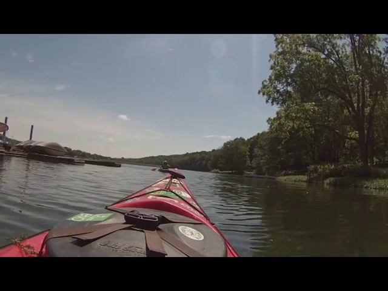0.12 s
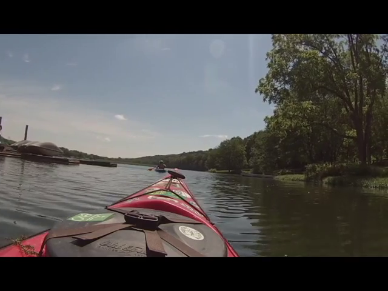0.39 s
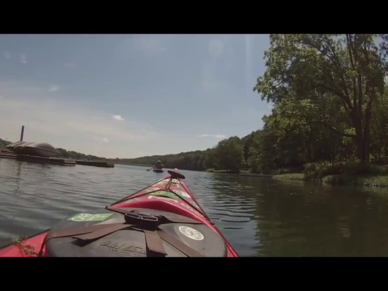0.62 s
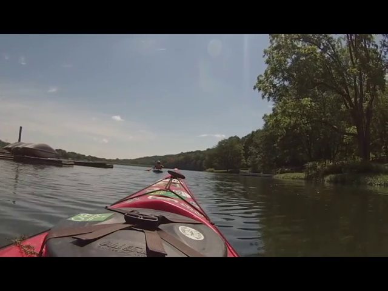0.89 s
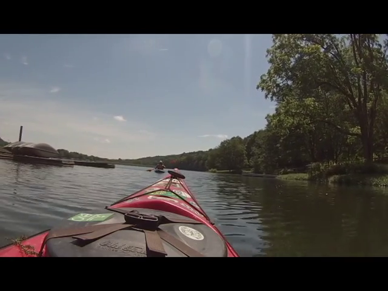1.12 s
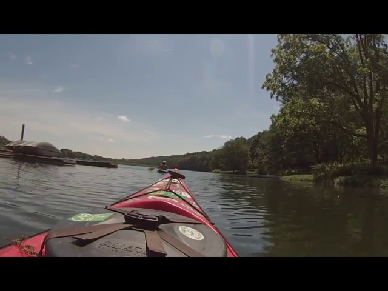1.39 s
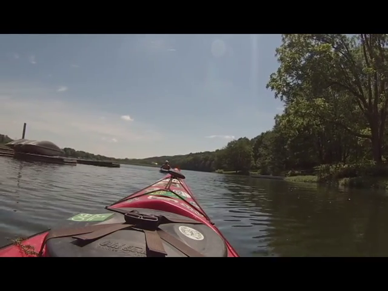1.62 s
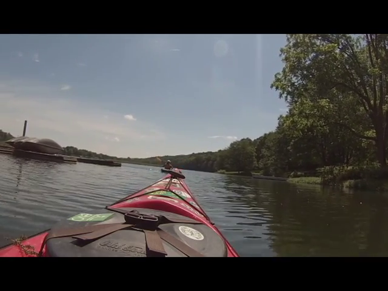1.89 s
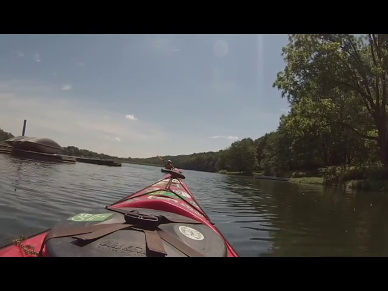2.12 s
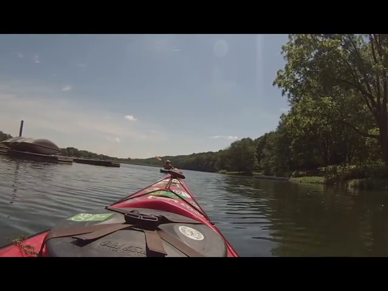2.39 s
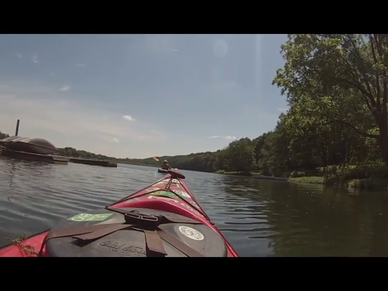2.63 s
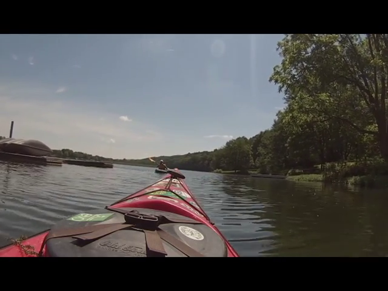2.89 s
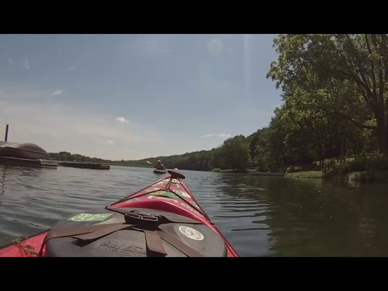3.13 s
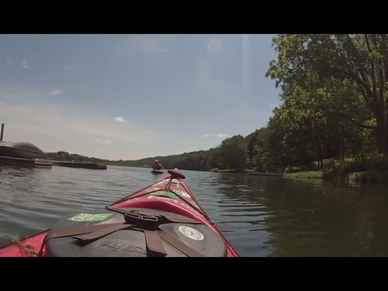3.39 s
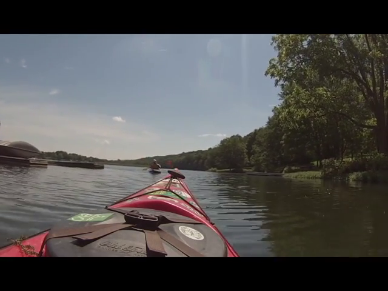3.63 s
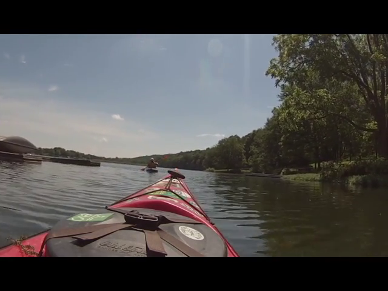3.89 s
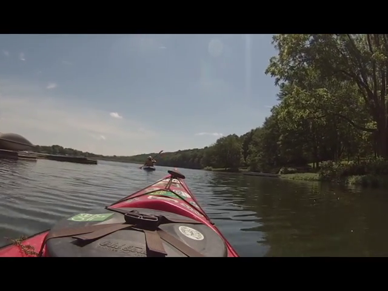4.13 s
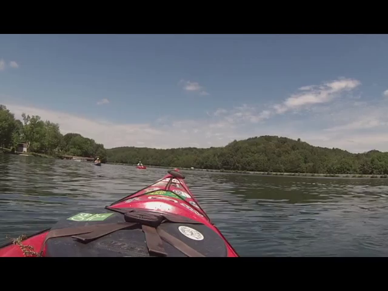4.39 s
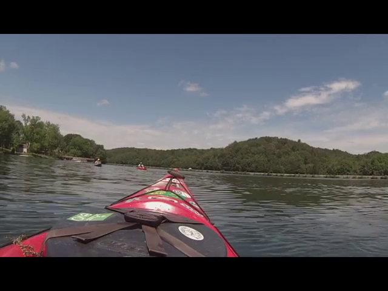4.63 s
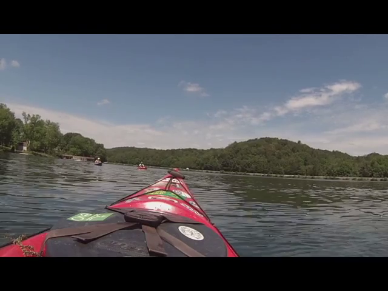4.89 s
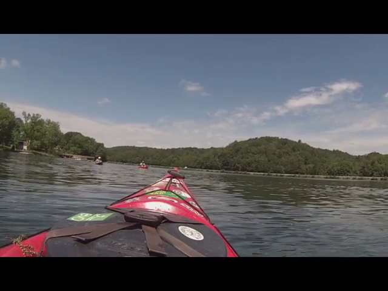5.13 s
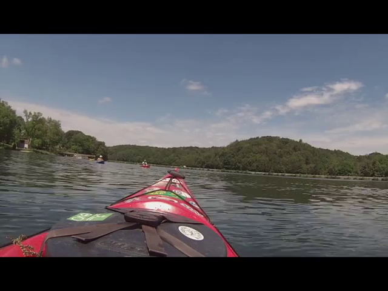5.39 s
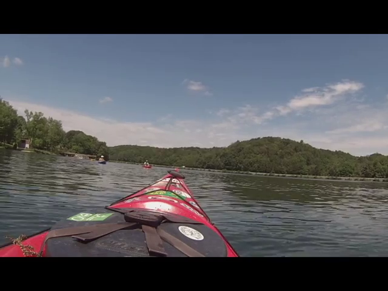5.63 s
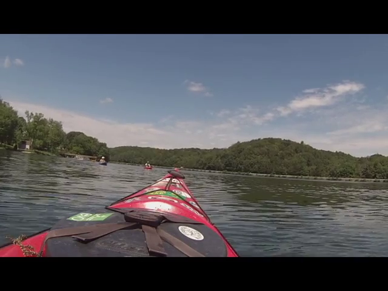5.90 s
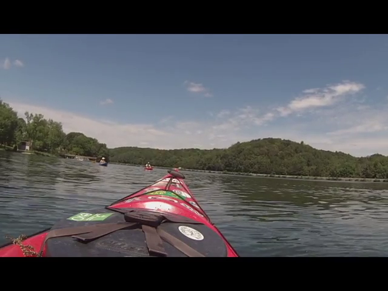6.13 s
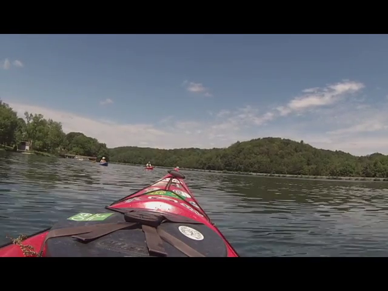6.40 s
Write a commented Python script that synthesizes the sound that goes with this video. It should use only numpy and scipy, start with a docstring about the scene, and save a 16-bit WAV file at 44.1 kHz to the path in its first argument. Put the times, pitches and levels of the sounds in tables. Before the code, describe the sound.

Steady, soft, bass-heavy hiss runs throughout, heard by a cased microphone fixed to a plastic kayak's deck, slightly muffled. In the first second there are faint buzzy bird calls, two tiny bumps at 0.2, a gentle lap and a ringing drip. At 1.3-1.5 a dry tap leads to a hollow paddle knock with small bounces, a low watery slap and bubbly drips rising in pitch. A thin distant whistle and light bumps come near 2; a little cluster of bumps with drips near 2.7. More faint bird calls pass at 3.1-3.5. Harder blows begin at 3.43, the loudest a cracking thump at 3.74, another at 3.92, with deep rocking and sliding rustle. From 4.0 the shaft drags in rapid stuttering jerks over a low murmur. At 4.39 it cuts dead, click, tiny silence, tick. Duller knocks follow at 4.48, 4.55 and 4.63, a faint thud at 4.88, then quiet hiss to 6.6.

```python
"""Far bird calls (gliding sines, throbbing noise) and light bumps over steady hiss; water laps (noise-shaken hull
modes) and drops ring (bubbles rising in pitch). A paddle knocks on a plastic kayak hull, heard from a case fixed to
the deck: struck modes, treble first through bending waves, with dry taps, cracks and low thumps (short decaying
sines). Harder blows follow, then the shaft drags in stick-slip jerks. A splice cuts the sound dead in mid-drag,
clicking on either side of a short silence; a calmer stretch with a few more blows follows."""
import sys
import numpy as np
from scipy import signal
from scipy.fft import rfft, irfft
from scipy.io import wavfile
from scipy.ndimage import uniform_filter1d

SR = 44100
rng = np.random.default_rng(int(sys.argv[2]) if len(sys.argv) > 2 else 0)


def to_wav(sig):
    """Store sig (one row per channel, or 1-D mono) as 16-bit WAV at the path in sys.argv[1].

    Samples outside -1..1 are clipped; the rate is SR.
    """
    pcm = np.clip(np.atleast_2d(sig), -1, 1) * 32767
    pcm = np.round(pcm).astype(np.int16)
    wavfile.write(sys.argv[1], SR, pcm.T)  # frames by channels


def undo_db(level):
    """Turn decibels back into plain size, where 20 dB means ten times bigger."""
    steps = np.asarray(level, float) / 20
    return 10 ** steps


N = 287529
TIME = np.arange(N) / SR
SPLICE_S, RETURN_S = 4.3869, 4.3958   # silence between
BEFORE_SPLICE = TIME < SPLICE_S


def rms_one(x):
    """Scale to rms 1."""
    return x / np.sqrt(np.mean(x ** 2) + 1e-20)


def swell(start_s, length_s, edge):
    """Smooth rise, hold and fall; edge: share of the length per ramp, above 0.5 it turns short of full level."""
    nearest_end_s = np.minimum(TIME - start_s, start_s + length_s - TIME)
    return np.sin(np.pi / 2 * np.clip(nearest_end_s / (edge * length_s), 0, 1)) ** 2


def band_passed(noise, low_hz, high_hz):
    """Noise through a band-pass filter; rms 1."""
    band = signal.butter(2, [low_hz, high_hz], "band", fs=SR, output="sos")
    return rms_one(signal.sosfilt(band, noise))


# Spectrum of the hiss. Each row: frequency in Hz, relative density in dB per Hz.
HISS_SPECTRUM = [(12, -1.5), (20, -3), (146, -2.5), (255, -6), (285, -6), (377, -7.5), (422, -9.5),
                 (642, -11.5), (1710, -17), (12000, -34.5), (15000, -42.5), (15500, -68)]


def hiss(level_db=-56, waver_db=0.27, waver_rate_hz=12):
    """Steady microphone hiss: noise strongest in the bass, its level wavering a little."""
    hz = np.fft.rfftfreq(N, 1 / SR) + 1
    colour_hz, colour_db = np.transpose(HISS_SPECTRUM)
    colour = undo_db(np.interp(np.log(hz), np.log(colour_hz), colour_db))
    waver = np.interp(TIME, np.arange(80) / waver_rate_hz, rng.standard_normal(80))
    noise = rms_one(irfft(colour * rfft(rng.standard_normal(N)), N))
    return undo_db(level_db + waver_db * waver) * noise


# Thin bird whistles. Each row: start in seconds, length in seconds, first pitch in Hz, last pitch in Hz, level in dB.
WHISTLES = [(1.98, .058, 7650, 7800, -66.5), (3.258, 0.06, 7560, 7800, -67)]


def whistles(overtone_db=-15):
    """Gliding sines with a faint octave."""
    out = np.zeros(N)
    for s, length_s, from_hz, to_hz, db in WHISTLES:
        hz = np.interp(TIME, [s, s + length_s], [from_hz, to_hz])
        phase = 2 * np.pi * np.cumsum(hz) / SR
        tone = np.sin(phase) + undo_db(overtone_db) * np.sin(2 * phase)
        out += undo_db(db) * swell(s, length_s, 0.13) * tone
    return out


# Far buzzy bird calls. Each row: start in seconds, length in seconds, centre in Hz, width in Hz, level in dB.
BUZZES = [(0.105, 0.18, 3550, 245, -69), (0.298, 0.12, 3540, 300, -72), (0.54, 0.12, 3580, 252, -67.5),
          (1.042, 0.12, 3520, 250, -74), (1.89, 0.113, 3430, 300, -72), (3.089, 0.11, 3520, 300, -70.5),
          (3.202, 0.061, 3600, 297, -71), (3.314, 0.23, 8700, 1490, -73.5)]


def buzzes(throb_hz=70, depth=0.28):
    """Narrow noise that throbs."""
    out = np.zeros(N)
    white = rng.standard_normal(N)
    throb = 1 + depth * np.sin(2 * np.pi * throb_hz * TIME)
    for s, length_s, hz, width_hz, db in BUZZES:
        noise = band_passed(white, hz - width_hz / 2, hz + width_hz / 2)
        out += undo_db(db) * swell(s, length_s, 0.043) * throb * noise
    return out


# Drops from the blade. Each row: start in seconds, first amplitude in dB, first pitch in Hz.
DROPS = [(0.4295, -49, 3120), (1.0904, -51, 3600), (1.4477, -48, 4300), (1.4475, -50, 3100),
         (1.487, -51, 2170), (1.5857, -51, 3220), (1.595, -52, 3550), (1.6407, -49, 3380),
         (1.706, -60, 1520), (1.953, -54, 3500), (2.7077, -52, 2340), (2.8814, -54, 2320),
         (2.9532, -50, 3430)]


def drops(cycles=24.5, rise=0.092):
    """A drop traps a bubble that rings briefly, rising in pitch; it falls by e^3 in the given cycles."""
    out, t = np.zeros(N), np.arange(1500) / SR
    for s, db, hz in DROPS:
        turns = hz * t
        ring = np.sin(2 * np.pi * turns * (1 + rise * turns / cycles))
        out[round(s * SR):][:len(t)] += undo_db(db) * np.exp(-3 * turns / cycles) * ring
    return out


# Modes of the hull. Each row: frequency in Hz, level in dB, time to fall 60 dB in seconds.
HULL = [(25, -22, 0.6), (52.3, -14, 0.64), (74, -10, 0.39), (84.2, -8.5, 0.45), (104.4, -7.5, 0.18),
        (153.2, -6.5, 0.17), (192.2, -6, 0.28), (223.4, -8.5, 0.16), (227.8, 4, 0.043), (299, -17, 0.17),
        (396.8, -11, 0.1), (491, -5, 0.024), (585, -9.5, 0.027), (681, -3.5, 0.018), (787, 0.5, 0.026),
        (938.5, -1.5, 0.035), (1066, -4, 0.026), (1200, -3, 0.026), (1390, -8, 0.034), (1485, -8, 0.017),
        (1825, -10, 0.05), (1990, -15.5, 0.046), (2254, -2, 0.028), (2504, 2, 0.019), (2700, 0, 0.013),
        (2860, -0.5, 0.015), (3220, -12.5, 0.025), (3600, -11.5, 0.023), (4090, -16.5, 0.02),
        (4300, -17.5, 0.013), (6100, -12.5, 0.0025), (8340, -12.5, 0.0041)]
MODE_HZ = np.array(HULL)[:, 0]


def modes(hz, ring_share=1):
    """Spectrum of each hull mode, a decaying sine set off by a click; ring_share shortens those above 1100 Hz."""
    mode_hz, db, t60_s = np.transpose(HULL)[:, :, None]
    t60_s = t60_s * np.where(mode_hz > 1100, ring_share, 1)
    w = 2 * np.pi * mode_hz
    return undo_db(db) * SR * w / ((np.log(1000) / t60_s + 2j * np.pi * hz) ** 2 + w ** 2)


def shaken(low_hz, high_hz):
    """Noise shakes the hull modes of one range; rms 1."""
    hz = np.fft.rfftfreq(N, 1 / SR)[:int(3 * high_hz * N / SR)]
    chosen = (MODE_HZ > low_hz) & (MODE_HZ < high_hz)
    white = rng.standard_normal(len(hz)) + 1j * rng.standard_normal(len(hz))
    return rms_one(irfft(white * np.linalg.norm(modes(hz)[chosen], axis=0), N))


# Small waves slap the hull. Each row: centre in seconds, level in dB, drone level in dB, both before the swell shape.
LAPPING = [(0.39, -56, -59), (1.47, -56, -53), (2.65, -64, -68), (3.4, -70, -77)]
WAVE_S = 0.62   # length of a wave


def droning():
    """The belly drones at the height of each wave."""
    gain = sum(undo_db(db) * swell(s - WAVE_S / 4, WAVE_S / 2, 0.36) for s, _, db in LAPPING)
    return gain * shaken(130, 170)


def lapping_gain(ripple_db=-70.5):
    """Gain of the lapping water; a ripple murmurs between waves up to the splice."""
    waves = sum(undo_db(db) * swell(s - WAVE_S / 2, WAVE_S, 0.81) for s, db, _ in LAPPING)
    return undo_db(ripple_db) * BEFORE_SPLICE + waves


# Pressure of the shaft on the deck. Each row: time in seconds, level in dB.
DRAG = [(3.96, -45.5), (4.03, -62), (4.07, -36.5), (4.2, -40.5), (4.27, -36), (4.33, -37.5), (4.39, -35.5)]


def drag_gain():
    """Gain of the dragged shaft, interpolated in dB, silent outside the table."""
    s, db = np.transpose(DRAG)
    return uniform_filter1d(undo_db(np.interp(TIME, s, db, -150, -150)), size=441)


def rubbing(thud_db=-0.5):
    """The dragged shaft and the lapping water keep the low modes murmuring; the drag adds a thud below."""
    drag = drag_gain()
    murmur = (drag + lapping_gain()) * shaken(120, 500)
    thud = undo_db(thud_db) * drag * shaken(40, 120)
    return murmur + thud


def singing(level_db=-55, start_s=4.0, length_s=0.37):
    """The hull sings while slips come fast."""
    return undo_db(level_db) * swell(start_s, length_s, 0.082) * shaken(850, 1100)


# The boat rocks after blows. Each row: start in seconds, length in seconds, level in dB.
SWAYS = [(3.442, 0.42, -51), (3.767, 0.2, -45), (4.682, 0.5, -57)]


def rocking():
    """Noise shakes the deepest mode in slow swells."""
    return sum(undo_db(db) * swell(s, length_s, 0.22) for s, length_s, db in SWAYS) * shaken(20, 40)


# The wet blade slides on the deck. Each row: start in seconds, length in seconds, level in dB.
RUSTLES = [(3.437, 0.33, -66.5), (3.745, 0.27, -63), (3.986, 0.43, -61)]


def rustling():
    """Band noise of sliding friction, stopped by the splice."""
    gain = sum(undo_db(db) * swell(s, length_s, 0.13) for s, length_s, db in RUSTLES)
    return gain * BEFORE_SPLICE * band_passed(rng.standard_normal(N), 600, 3600)


# Dry taps, cracks and low thumps. Each row: start in seconds, level in dB before the low-pass, pitch in Hz,
# cycles to fall by e.
TAPS = [(1.281, -25.5, 770, 0.38), (1.3772, -35.5, 3000, 6.2), (1.3777, -35, 2340, 5.6),
        (1.378, -44, 3820, 5.4), (1.379, -35.5, 844, 5.2), (1.3828, -29, 430, 2.2), (1.465, -44, 1690, 2.9),
        (1.392, -35, 173, 3), (1.432, -38, 160, 4), (3.4343, -34.5, 2160, 2.5), (3.5332, -43, 2100, 2.2),
        (3.924, -31.5, 2370, 6.5), (1.4165, -41, 2380, 4.6), (3.7467, -21, 2480, 4),
        (3.7515, -20, 2260, 1.1), (3.764, -39, 2300, 5.5), (3.804, -44, 1920, 2.1), (4.557, -36, 2080, 1.3)]


def taps():
    """A dry tap, crack or low thump is a sine that dies within a few cycles."""
    out, t = np.zeros(N), np.arange(3000) / SR
    for s, db, hz, cycles in TAPS:
        out[round(s * SR):][:len(t)] -= undo_db(db) * np.exp(-hz * t / cycles) * np.sin(2 * np.pi * hz * t)
    return signal.sosfilt(signal.butter(2, 4500, fs=SR, output="sos"), out)


# Where heft, belly, body, hollow, knock, crack, tick and fizz of a contact apply. Each entry: frequency in Hz.
FORCE_HZ = [77, 150, 231, 760, 925, 1750, 2520, 4000]
BELLY_SHARE = 0.84   # how far the belly follows the heft


def force(db, heft, body, hollow, knock, tick, crack, fizz):
    """Force at FORCE_HZ in dB; crack is relative to the mean of knock and tick, fizz to the tick."""
    belly = body + BELLY_SHARE * (heft - body)
    return db + np.array([heft, belly, body, hollow, knock, (knock + tick) / 2 + crack, tick, tick + fizz])


# Blows and bumps: the blade brushes the hull just before it lands.
CHATTER_MS, TOUCH_DB, SCATTER_DB = 2.13, -23.5, -5
CRACK_DB, FIZZ_DB = -2, -1.5

# Paddle blows. Each row: start in seconds, body in dB, hardness in dB, heft in dB (both above body),
# lag of 200 Hz behind the treble in ms, loading included.
BLOWS = [(1.372, -23.5, -8, -51, 23.3), (3.4285, -18, -2, -5, 9.9), (3.531, -28, -7, 1, 8.7),
         (3.7387, -8.5, -2, -15, 8.9), (3.759, -32.5, -10, 2, 6.8), (3.802, -15, -12.5, -6.5, 7.78),
         (3.9155, -13.5, -3.5, -11, 7.8), (4.02, -23.5, -16, -30, 5), (4.249, -27, -15, -9, 5.78),
         (4.476, -22, -5, 3, 4.6), (4.552, -17.5, -9.5, -12.5, 9.3), (4.63, -23, -7.5, 1.5, 8),
         (4.875, -55.5, -11.5, 12.5, 7)]


def blow_contacts(hollow_db=5.5, late_hollow_db=-3.5, tick_share=1.6, tick_db=-17.5):
    """Hardness sets knock, hollow and tick; blows after the splice land on a stiffer spot."""
    rows = []
    for s, db, hard, heft, lag_ms in BLOWS:
        hollow = hard + hollow_db + late_hollow_db * (s > SPLICE_S)
        force_db = force(db, heft, 0, hollow, hard, tick_share * hard + tick_db, CRACK_DB, FIZZ_DB)
        rows.append((s, force_db, lag_ms, CHATTER_MS, undo_db(TOUCH_DB), SCATTER_DB, 0))
    return rows


# Light bumps and bounces. Each row: start in seconds, body in dB, tick above body in dB.
BUMPS = [(0.179, -41.5, -11.5), (0.201, -45, -11), (1.411, -45, -12), (1.431, -35, -31), (1.4615, -57, 4),
         (1.49, -46, -7), (1.526, -49, -16), (1.994, -46, -20), (2.13, -49, -19), (2.149, -50, -21),
         (2.485, -48, -17), (2.524, -48.5, -26), (2.65, -37.5, -17), (2.666, -36.5, -20), (2.678, -47, -1),
         (2.688, -42, -13), (2.706, -47.5, -3), (2.925, -52, -9), (3.635, -43, -18), (3.866, -37, -11.5),
         (3.886, -44.5, -9), (4.522, -40.5, -12)]


def bump_contacts(heft_db=-29, knock_share=0.67, knock_db=2.5, lag_ms=4.26):
    """Light contacts with little heft; the tick sets hollow and knock alike."""
    rows = []
    for s, db, tick in BUMPS:
        knock = knock_share * tick + knock_db
        force_db = force(db, heft_db, 0, knock, knock, tick, CRACK_DB, FIZZ_DB)
        rows.append((s, force_db, lag_ms, CHATTER_MS, undo_db(TOUCH_DB), SCATTER_DB, 0))
    return rows


# The dragged shaft sticks and slips. Each row: start in seconds, knock in dB, tick above knock in dB.
SLIPS = [(3.992, -30.5, -10), (4.005, -28, -17), (4.02, -28.5, -8.5), (4.033, -24, -11), (4.048, -26.5, -1),
         (4.068, -28.5, -2), (4.09, -28.5, -3), (4.112, -27, -3.5), (4.134, -27.5, -4), (4.152, -29, -2),
         (4.171, -27, -6.5), (4.195, -28, -4), (4.225, -27, 2.5), (4.248, -27, -2.5), (4.297, -37, 3.5),
         (4.345, -29.5, -5)]


def slip_contacts(heft_db=-2, body_db=-15.5, hollow_db=-8.5, crack_db=-5.5, fizz_db=-0.5,
                  lag_ms=3.96, chatter_ms=1, scatter_db=-5.5):
    """Slips, close by, echo less and have no first touch; heft, body and hollow are relative to the knock."""
    rows = []
    for s, db, tick in SLIPS:
        force_db = force(db, heft_db, body_db, hollow_db, 0, tick, crack_db, fizz_db)
        rows.append((s, force_db, lag_ms, chatter_ms, 0, scatter_db, 1))
    return rows


PUSH_HZ, ROUGH_HZ = 1150, 1340   # softness of the push; above ROUGH_HZ modes answer mostly the chatter
SCATTER_HZ, SCATTER_MS = 160, 28   # echoes off ribs and rim: low corner, decay
LOAD_MS = 2.768   # part of the lag spent loading the contact
CASE_HZ, PORT_HZ = 5900, 34.3   # the sealed case dulls the treble, the microphone loses the deepest bass
SPREAD_DB, SLIP_SPREAD_DB = 2, 1.06   # random spread per mode; slips, all at one spot, ring more alike
SLIP_WAIT_MS = 1.53   # chatter of a slip starts late
REBOUND_MS, REBOUND_DB, LAST_REBOUND_DB = 5.7, -6.5, -25   # mean spacing and levels of two rebounds
HELD_RING = 0.86   # ring left in the upper modes while the blade lies on the hull


def rebounds(hz, slips):
    """After a slip the shaft rebounds twice; other contacts land once."""
    spacing_s = REBOUND_MS * (1 + 0.06 * rng.standard_normal()) / 1000
    hop = np.exp(-2j * np.pi * hz * spacing_s)
    first = undo_db(REBOUND_DB + SPREAD_DB * rng.standard_normal()) * hop
    return 1 + slips * (first + undo_db(LAST_REBOUND_DB) * hop ** 2)


def contacts():
    """Chatter opens each contact, a dull push follows; bending waves delay it by 1 / sqrt(Hz)."""
    size = 2 ** 15
    hz = np.fft.rfftfreq(size, 1 / SR)
    free, held = modes(hz), modes(hz, HELD_RING)
    before, after = np.zeros(N + size), np.zeros(N + size)
    push = 1 / (1 + 1j * hz / PUSH_HZ) ** 2
    loading = np.exp(-2j * np.pi * hz * LOAD_MS / 1000)
    case = 1 / (1 + 1j * hz / CASE_HZ) ** 2 * (1 - 1 / (1 + 1j * hz / PORT_HZ)) ** 3
    rough = 1 / (1 + (ROUGH_HZ / MODE_HZ) ** 4)   # high modes answer the chatter, low modes the push
    age_ms = np.arange(1024) * 1000 / SR
    echo_decay = np.exp(-age_ms / SCATTER_MS)
    echo_decay = echo_decay / np.linalg.norm(echo_decay)
    scattered = 1 - 1 / (1 + 1j * hz / SCATTER_HZ)   # long waves pass the ribs unturned
    # neighbours in antiphase leave no hollows
    signs = np.where(MODE_HZ > 300, (-1.) ** np.arange(len(HULL)), 1)

    every = blow_contacts() + bump_contacts() + slip_contacts()
    for s, force_db, lag_ms, chatter_ms, touch, scatter_db, slips in every:
        hops = rebounds(hz, slips)
        echoes = scattered * rfft(rng.standard_normal(len(age_ms)) * echo_decay, size)
        landing = push * (1 + undo_db(scatter_db) * echoes) * (touch + loading)

        late_ms = np.maximum(age_ms - slips * SLIP_WAIT_MS, 0)
        burst = late_ms ** 1.17 * np.exp(-late_ms / chatter_ms)   # swells, then fades
        chatter = rfft(rng.standard_normal(len(age_ms)) * burst / np.linalg.norm(burst), size)

        mode_db = np.interp(np.log(MODE_HZ), np.log(FORCE_HZ), force_db)
        spread_db = SLIP_SPREAD_DB if slips else SPREAD_DB
        strengths = signs * undo_db(mode_db + spread_db * rng.standard_normal(len(HULL)))
        ringing = free if slips else held
        pushed = (strengths * np.sqrt(1 - rough)) @ ringing * landing
        chattered = (strengths * np.sqrt(rough)) @ ringing * chatter

        travel_s = max(lag_ms - LOAD_MS, 0) / 1000   # delay at 200 Hz
        travel = np.exp(-4j * np.pi * travel_s * np.sqrt(200 * hz))
        part, at = before if s < SPLICE_S else after, round(s * SR)
        part[at:at + size] += irfft((pushed + chattered) * hops * travel * case)
    return before[:N] * BEFORE_SPLICE + after[:N]   # no ring carries over the splice


def scene():
    """All sources at one microphone."""
    hull = contacts() + droning() + rustling() + singing() + rocking() + rubbing() + taps()
    background = drops() + whistles() + buzzes() + hiss()
    return (hull + background)[None]


def top_cut(x):
    """Nothing passes above the cut-off."""
    return signal.sosfilt(signal.butter(12, 16540, fs=SR, output="sos"), x)


def record(dry, cut_db=-29, cut_rise_ms=1.2, return_db=-42):
    """The splice falls on the crest of a swing and clicks; after a short silence sound returns with a thin tick."""
    cut, back = round(SPLICE_S * SR), round(RETURN_S * SR)
    to_cut_ms = np.maximum(SPLICE_S - TIME, 0) * 1000
    crest = np.exp(-(to_cut_ms / cut_rise_ms) ** 2) * BEFORE_SPLICE
    swung = dry + crest * (undo_db(cut_db) - dry[:, cut, None])
    spliced = swung * (BEFORE_SPLICE | (TIME > RETURN_S))
    spliced[:, back:back + 3] += undo_db(return_db) * np.array([.5, -1, .5])
    return top_cut(spliced)


dry = scene()
out = record(dry)
to_wav(out)
```